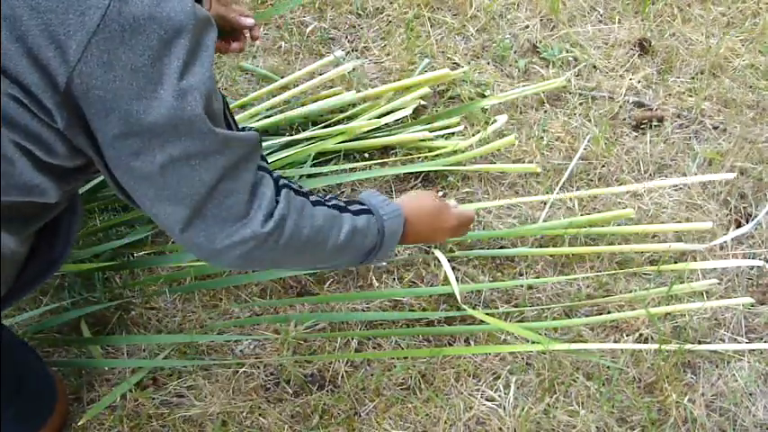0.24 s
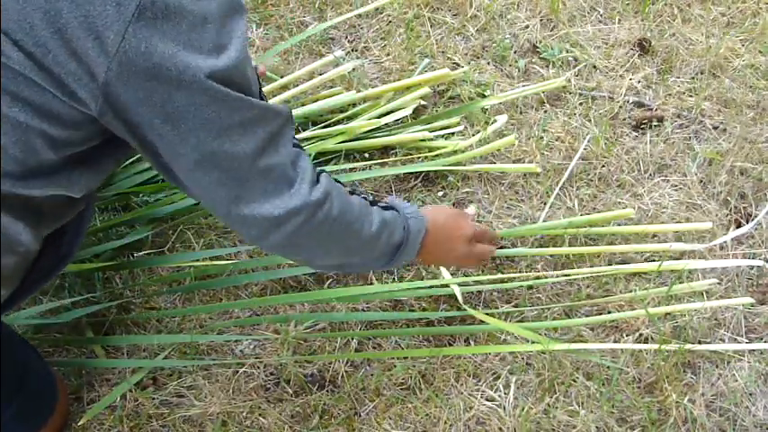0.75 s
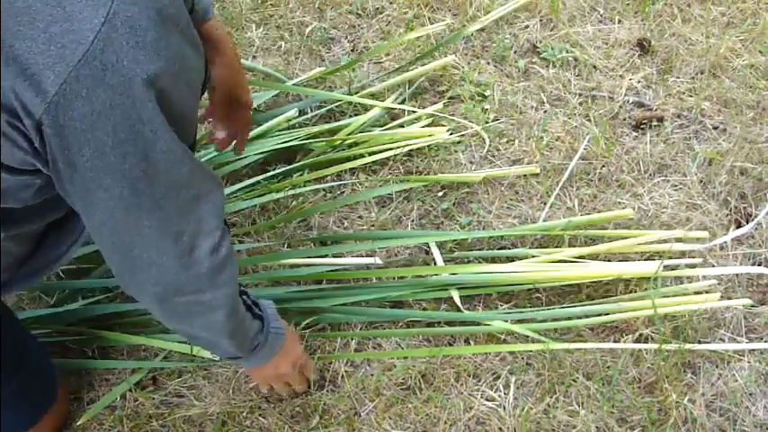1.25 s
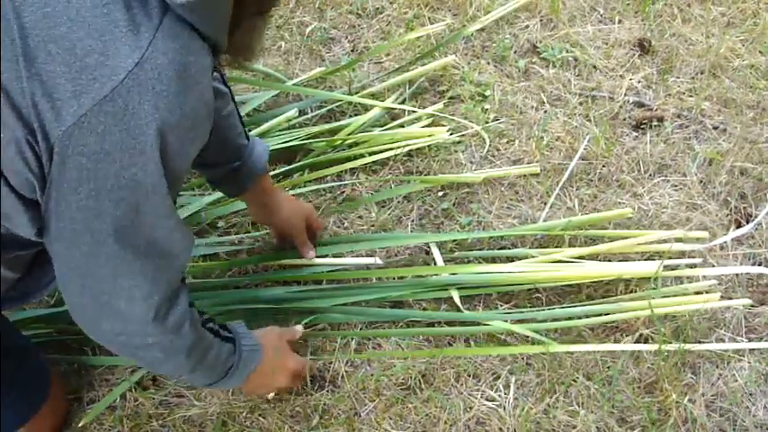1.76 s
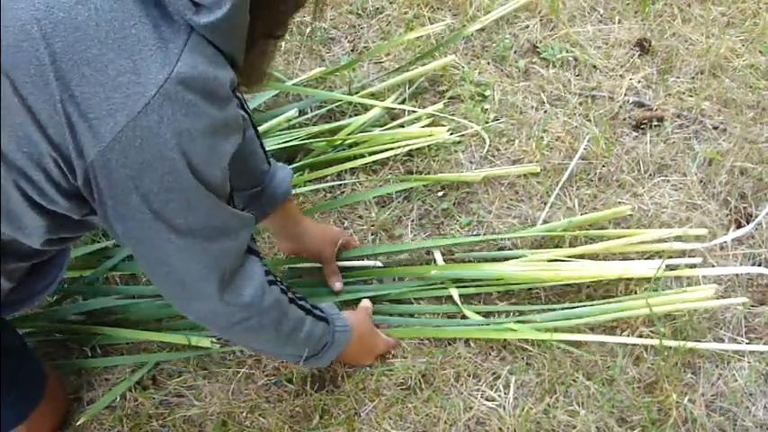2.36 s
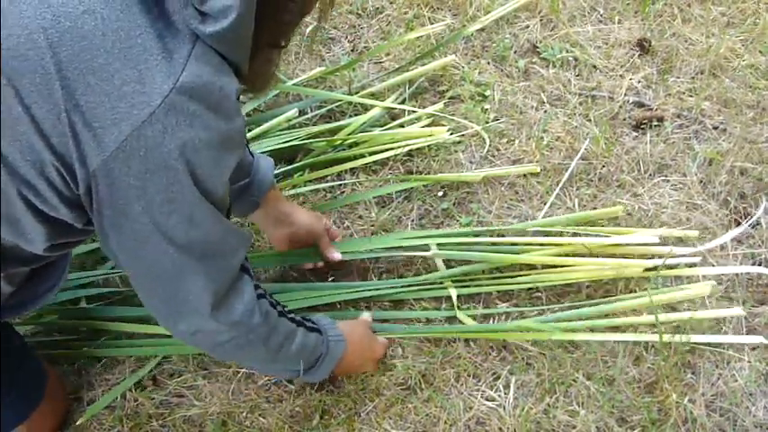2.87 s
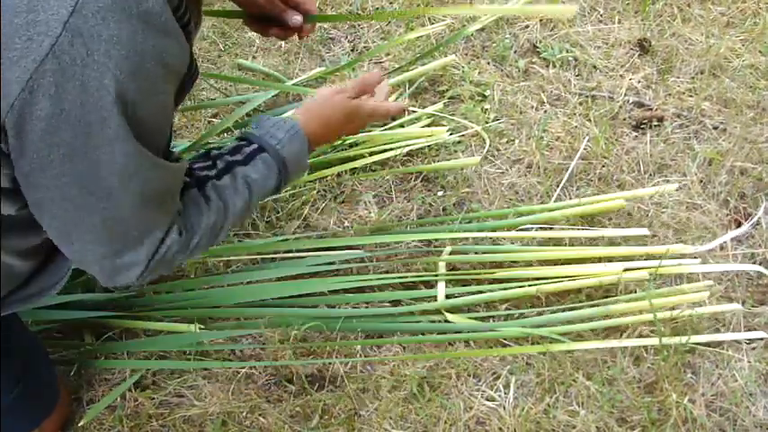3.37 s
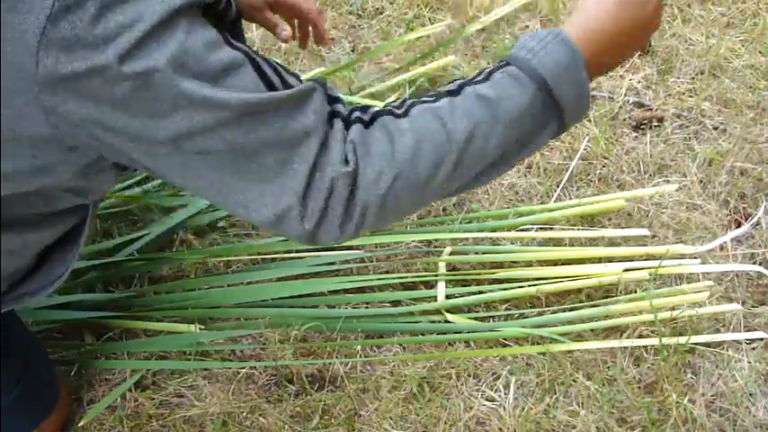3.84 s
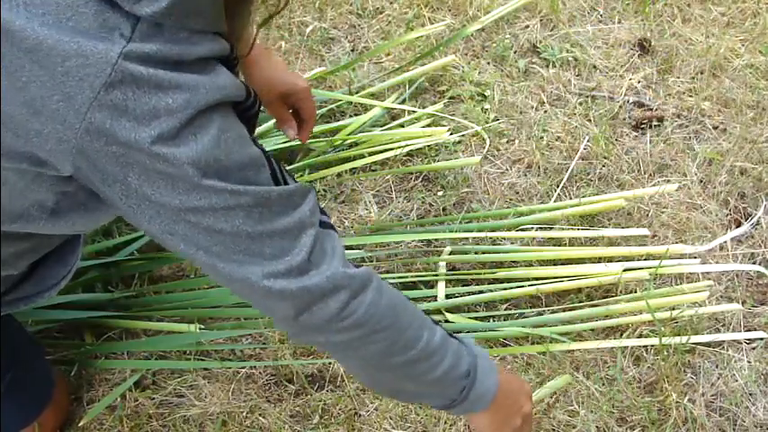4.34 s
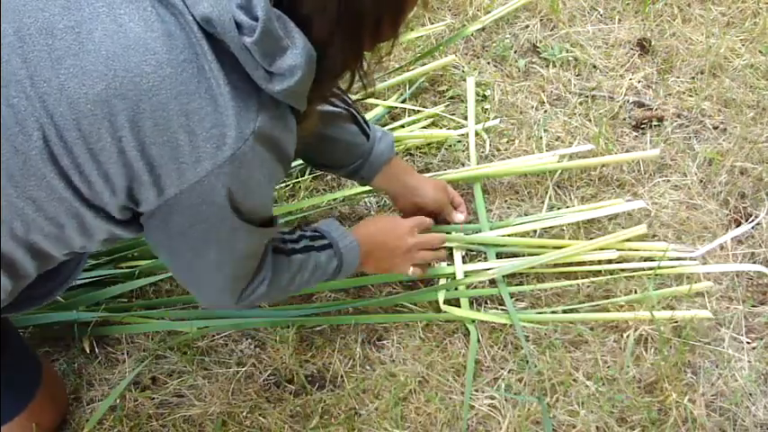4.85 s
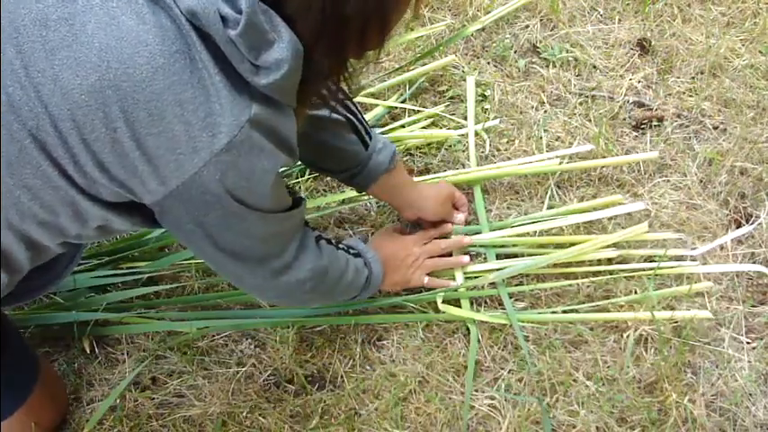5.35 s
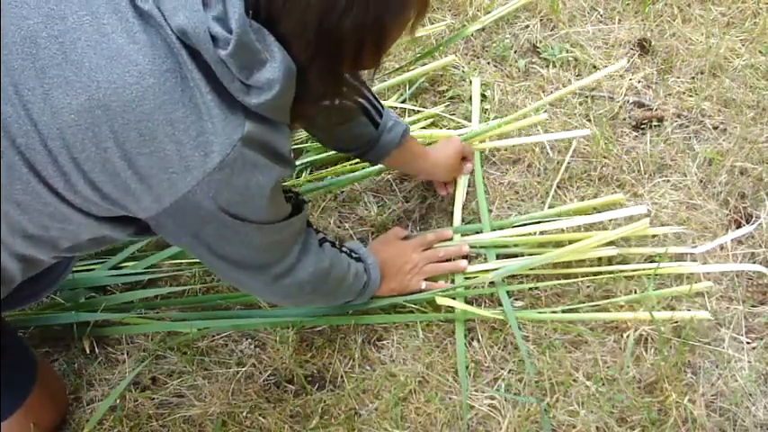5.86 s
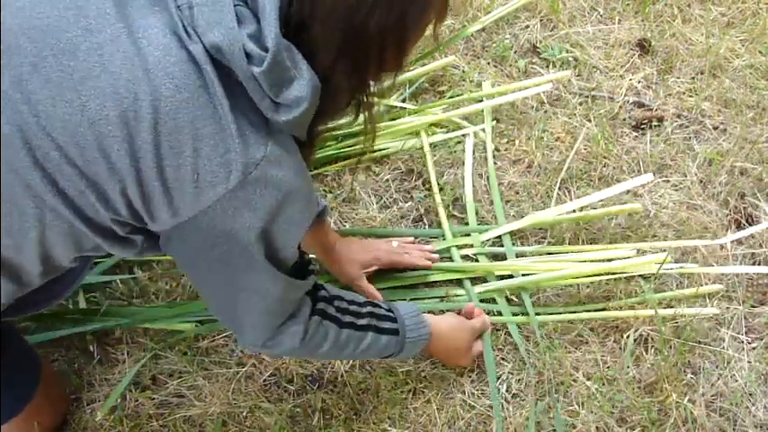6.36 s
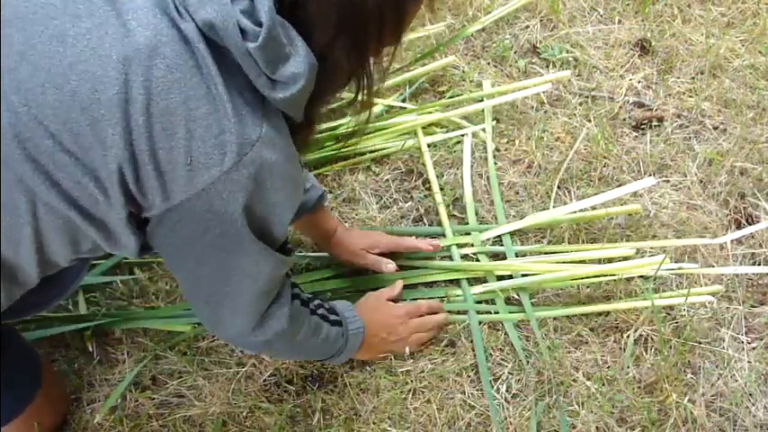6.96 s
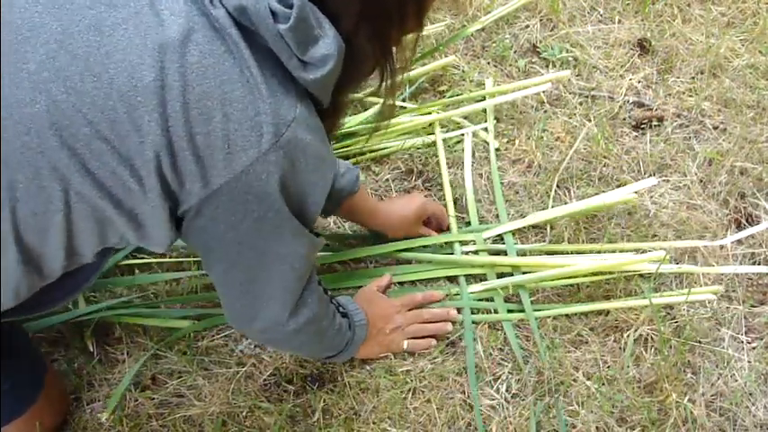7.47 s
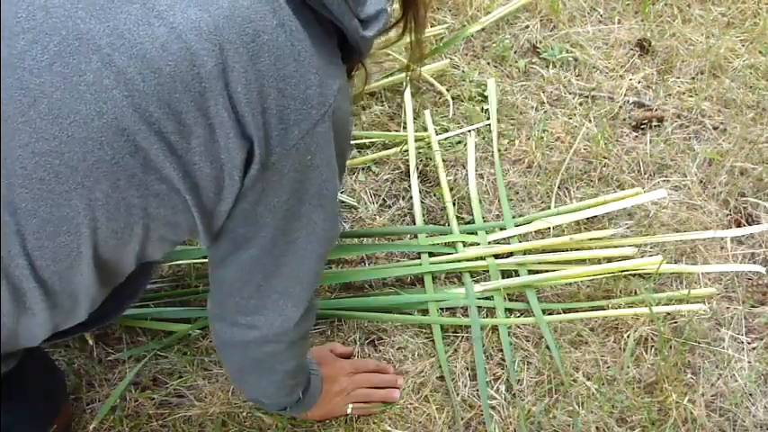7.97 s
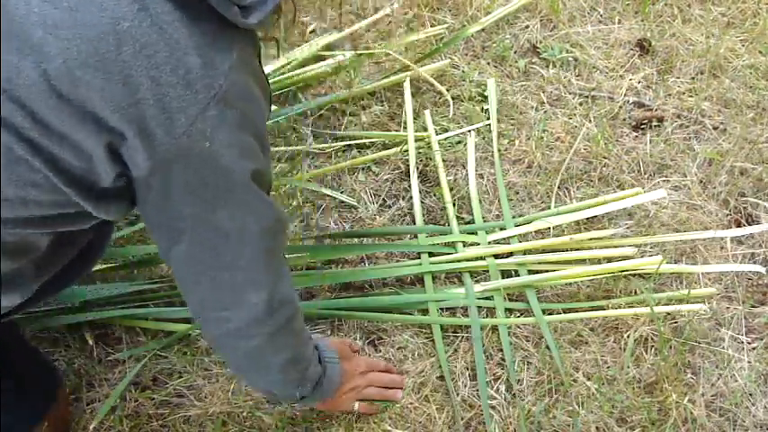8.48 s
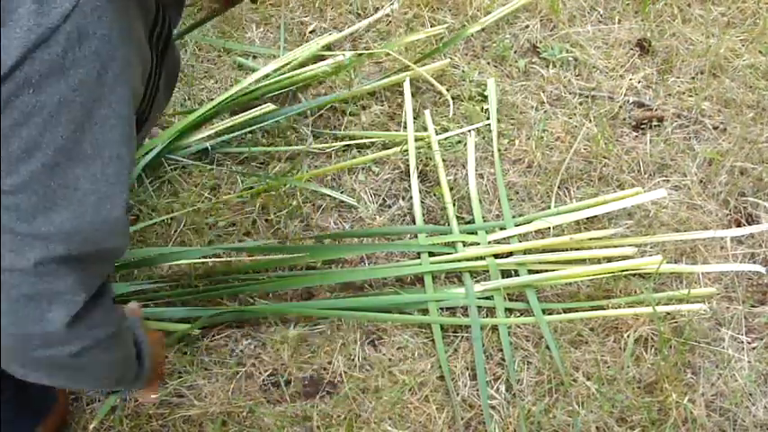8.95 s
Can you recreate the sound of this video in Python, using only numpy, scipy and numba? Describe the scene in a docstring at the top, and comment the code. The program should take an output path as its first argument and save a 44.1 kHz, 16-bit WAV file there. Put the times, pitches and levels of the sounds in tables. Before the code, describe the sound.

Outdoors, close and centred, long stiff leaves are handled over a quiet airy murmur. From 0 to 2 s there is light dry rustling, with a short swish and double tick near 0.8 and faint bird notes at 1.2 to 1.4 and 2.1. From 2.2 to 3.2 the bundle is pushed together: dense, coarse swishing and crackling, a hard snap at 2.8, and a low breath of wind rumbling on the microphone. It drops to near quiet, then softer drags pass at 3.5 to 3.8 and small crackles at 4.1 to 4.6. Rubbing builds from 5.1, with bright sharp snaps at 5.55 and a strong rustling swell to 6.0 and 6.2, then another stroke at 6.4 to 6.6. Meanwhile a songbird warbles rapid gliding whistles, 4.8 to 7.3. Crisp strokes crackle at 7.5 and 7.75; sparse rustle follows, ending with small snaps around 9.1.

```python
"""Weaving long stiff leaves outdoors

Long stiff leaves are dragged and stroked by hand: thousands of tiny slips excite bands of noise that
swish around a moving blade resonance. Creases snap as short noise bursts ringing in a resonator.
A songbird warbles in gliding, near-sine whistles with a faint echo from the trees. Band-filtered noise
murmurs underneath as open air, and the breeze rumbles on the microphone."""
import sys
import numpy as np
from scipy import signal
from scipy.io import wavfile
from scipy.ndimage import uniform_filter1d
from numba import njit

SR = 44100
rng = np.random.default_rng(int(sys.argv[2]) if len(sys.argv) > 2 else 0)


def unload_wav(signal):
    """Save mono or channel-first audio to the path in sys.argv[1] as 16-bit WAV at rate SR, clipped to [-1, 1]."""
    wavfile.write(
        sys.argv[1],
        SR,
        np.round(np.clip(np.atleast_2d(signal).T, -1, 1) * 32767).astype(np.int16),
    )


N = 406161


def undb(db):
    """Decibel law: amplitude gain of a level in dB."""
    return 10 ** (np.asarray(db) / 20)


def unit(x):
    """Normalization: the signal scaled to rms 1."""
    return x / np.sqrt(np.mean(x ** 2))


def curves(table):
    """Linear interpolation: the columns after the time column, one value per sample."""
    seconds, *columns = np.transpose(table)
    return [np.interp(np.arange(N) / SR, seconds, column) for column in columns]


def band_db(table, hz):
    """Proportional bandwidth: a density in dB per Hz gives more level in a wider, higher band."""
    table_hz, db = np.transpose(table)
    density_db = np.interp(np.log(hz), np.log(table_hz), db)
    return density_db + 10 * np.log10(hz / 1000)


@njit
def svf(x, hz, width):
    """Second-order resonance: state-variable band-pass, gain 1 at the centre, width in Hz."""
    y, band_state, low_state = np.empty(len(x)), 0., 0.
    g, damping = np.tan(np.pi * hz / SR), width / hz
    for i in range(len(x)):
        v = (band_state + g * (x[i] - low_state)) / (1 + g * (g + damping))
        band_state = 2 * v - band_state
        low_state = low_state + 2 * g * v
        y[i] = damping * v
    return y


def band(x, hz, share):
    """Cascaded resonance: two passes steepen the skirts; share is each pass's width over its centre."""
    once = svf(x, hz, share * hz)
    return unit(svf(once, hz, share * hz))


def walk(rate):
    """Smoothed random modulation: levels held 1 / rate seconds, averaged twice, rms 1."""
    hold = int(SR / rate)
    steps = np.repeat(rng.standard_normal(N // hold + 1), hold)
    slewed = uniform_filter1d(uniform_filter1d(steps, hold), hold)
    return unit(slewed[:N])


def slips(rate, spread_db):
    """Stick-slip: sparse clicks of either sign, rate per second, many small and a few large."""
    out, count = np.zeros(N), int(rate * N / SR)
    when, size, sign = rng.random((count, 3)).T
    size_db = spread_db * np.minimum(-np.log(1 - size), 5)
    out[(when * N).astype(int)] = np.sign(sign - .5) * undb(size_db)
    return unit(out)


def leaves():
    """Frictional excitation: leaf slips click in all bands, fibres hiss in one, loose tips ring."""
    # Mean leaf spectrum. Each row: frequency in Hz, relative density in dB per Hz.
    leaf_spectrum = [(1000, -21), (1600, -6.5), (2400, -3.5), (3200, -3.5), (4500, -5.5), (5800, -1.5),
                     (7500, -4), (10500, -6.5)]
    # The whole bundle is pushed together and its thick stems rub too.
    push_start_s, push_end_s, stem_hz, stem_peak_db = 2.3, 3.1, 2200, 4
    level_db, blade_hz, bright_db = handling()
    effort = np.clip((level_db + 60.5) / 14, .2, 1.3)  # harder pulls catch more and crackle more
    whole, catch = slips(rate=500, spread_db=2.8), walk(60)  # shared by all bands
    t = np.arange(N) / SR
    pushed = np.clip(10 * np.minimum(t - push_start_s, push_end_s - t), 0, 1)
    out, power = 0, 0
    for hz in 1000 * 2 ** np.arange(0, 3.5, 1 / 3):
        fibres = slips(rate=3000, spread_db=2.8)
        hiss = band(.45 * effort * whole + fibres, hz, share=.38)
        tips = unit(svf(slips(rate=70, spread_db=3.5), hz, 0.09 * hz))
        edge = np.clip(np.log2(hz / 6000), 0, 1)  # thin edges sing higher than broad blades
        blade_db = 6.5 * np.exp(-(np.log2(hz / blade_hz) / 0.52) ** 2)
        stem_db = stem_peak_db * pushed * np.exp(-(2 * np.log2(hz / stem_hz)) ** 2)
        gain = undb(band_db(leaf_spectrum, hz) + blade_db + stem_db + edge * bright_db)
        grip_db = 1.5 * effort * catch + 2.4 * walk(24)  # the grip catches and lets go
        out = out + gain * undb(grip_db) * (hiss + 0.3 * effort * tips)
        power = power + gain ** 2
    return undb(level_db) * out / np.sqrt(power)  # resonances reshape the spectrum, not the level


def handling():
    """Power addition: strokes swell and die over the drag; the louder rub weighs more in the resonance."""
    # Leaves dragging under the hands. Each row: time in seconds, level in dB, blade resonance in Hz,
    # thin-edge brightness in dB.
    drag = [(0, -55, 5800, -1), (.86, -59.5, 5460, -1), (1.9, -49, 5600, -1), (2.17, -49, 4200, 0),
            (2.5, -47, 6000, 0.5), (3.0, -69, 5800, -4), (3.45, -68, 4500, 3), (3.76, -51.5, 4200, -1.5),
            (4.15, -59, 4300, -4), (4.4, -59, 7000, 7), (5.04, -63.5, 4000, -2), (5.52, -49.5, 5000, 8),
            (5.78, -45, 3600, 9), (5.95, -41.5, 4600, 5), (6.08, -64, 4300, 8), (6.55, -53, 4600, 3.5),
            (7.6, -57, 5000, -2), (8.2, -65.5, 4300, 4.5), (8.5, -57, 3200, 1), (9.21, -57, 4500, -4)]
    # Single strokes. Each row: loudest moment in seconds, peak level in dB, seconds to gain the last
    # 10 dB, seconds to lose the first 10 dB, blade resonance in Hz.
    strokes = [(0.794, -42.5, 0.04, 0.035, 6400), (2.322, -46, 0.07, 0.01, 6200),
               (2.414, -41, 0.04, 0.02, 4000), (2.459, -33, 0.0265, 0.006, 5800),
               (2.547, -41, 0.008, 0.012, 4500), (2.603, -44.5, 0.146, 0.045, 5370),
               (2.713, -35.5, 0.049, 0.026, 4400), (2.768, -40.5, 0.009, 0.076, 4700),
               (2.872, -42.5, 0.1, 0.11, 5630), (2.977, -46.5, 0.04, 0.02, 6000),
               (3.087, -44, 0.135, 0.008, 5700), (3.177, -48, 0.015, 0.014, 5200),
               (3.478, -46.5, 0.008, 0.03, 4100), (3.61, -49.0, 0.191, 0.082, 3800),
               (4.436, -47.5, 0.12, 0.035, 5800), (4.516, -45.5, 0.02, 0.01, 6100),
               (4.617, -49.5, 0.046, 0.05, 5500), (5.105, -47, 0.053, 0.018, 4000),
               (5.182, -47.5, 0.035, 0.1, 4000), (5.369, -46.5, 0.04, 0.1, 3600),
               (5.424, -43.5, 0.02, 0.08, 5800), (5.535, -38.5, 0.004, 0.03, 4600),
               (6.003, -39.5, 0.19, 0.07, 4200), (6.181, -38.5, 0.04, 0.0051, 4700),
               (6.233, -39.0, 0.04, 0.0055, 4500), (6.428, -44, 0.25, 0.04, 5200),
               (6.607, -41, 0.042, 0.12, 5500), (7.035, -48, 0.08, 0.05, 5000),
               (7.392, -43, 0.08, 0.012, 4300), (7.439, -47.5, 0.06, 0.04, 3400),
               (7.508, -38.5, 0.012, 0.04, 5200), (7.743, -37.5, 0.084, 0.0261, 5900),
               (8.553, -49, 0.03, 0.02, 6000)]
    t, (drag_db, drag_hz, bright_db) = np.arange(N) / SR, curves(drag)
    power = undb(2 * drag_db)  # doubling the dB turns amplitude into power
    weighted_hz = drag_hz * power
    for peak_s, peak_db, rise_s, fall_s, stroke_hz in strokes:
        i = slice(int(max(peak_s - 4 * rise_s, 0) * SR), int((peak_s + 4 * fall_s) * SR))
        away = np.maximum((peak_s - t[i]) / rise_s, (t[i] - peak_s) / fall_s)
        stroke_power = undb(2 * (peak_db - 10 * away))
        power[i] += stroke_power
        weighted_hz[i] += stroke_power * stroke_hz
    return 10 * np.log10(power), weighted_hz / power, bright_db


def snaps():
    """Impulse response: a noise crack gives a broad tick and rings the blade; big creases tear longer."""
    # Creases that snap. Each row: start in seconds, peak level in dB, ring frequency in Hz.
    creases = [(0.7709, -26, 6800), (0.7885, -27, 6150), (1.131, -35, 8500), (2.1874, -31, 2600),
               (2.452, -20.5, 2600), (2.716, -28, 1900), (2.7668, -14, 5600), (2.779, -32, 2000),
               (2.8654, -28, 5930), (2.92, -36, 2200), (2.972, -35, 2900), (3.475, -35, 5330),
               (4.086, -33, 2610), (4.2906, -28, 8120), (4.3825, -24.5, 7210), (4.6233, -28, 1900),
               (5.1472, -29.5, 4200), (5.5335, -19, 8000), (5.565, -15, 9400), (5.611, -32, 4600),
               (5.879, -26, 7500), (5.9763, -17.5, 4900), (6.2305, -20.5, 6000), (6.4186, -26, 3100),
               (7.4958, -28, 5490), (7.6076, -34, 5460), (7.7, -26, 8500), (7.737, -25, 5700),
               (7.7594, -26.5, 5200), (9.028, -35, 3000), (9.1222, -26, 7300)]
    out, t = np.zeros(N + 1024), np.arange(1024) / SR
    for start_s, peak_db, ring_hz in creases:
        noise = rng.standard_normal(len(t))
        tear_s = 0.00053 * undb(.13 * (peak_db + 33))  # time at which the tear is strongest
        tear = t / tear_s * np.exp(1 - t / tear_s)
        tail = .04 * undb(-60 * t / 0.027)  # falls 60 dB in 27 ms
        crack = noise * (tear + tail)
        ring, tick = svf(crack, 1. * ring_hz, .4 * ring_hz), svf(crack, 7000., 9000.)
        snap = ring + .22 * tick
        i = int(start_s * SR)
        out[i:i + len(t)] += undb(peak_db) * snap / np.abs(snap).max()
    return out[:N]


def bird():
    """Frequency modulation: gliding sines with soft ends and a slight waver, then a diffuse echo."""
    # Songbird notes, each a glide with one turn. Each row: start, turn and end in seconds, start, turn
    # and end frequency in Hz, level at the turn in dB before flicker.
    notes = [(1.149, 1.18, 1.24, 3520, 2900, 3500, -58), (1.3, 1.33, 1.35, 4060, 4140, 3840, -52.5),
             (1.35, 1.385, 1.4, 3840, 3910, 3540, -52), (2.07, 2.135, 2.19, 3980, 4330, 4200, -54),
             (3.298, 3.4, 3.47, 4010, 4020, 4060, -62), (4.838, 4.875, 5.005, 4750, 5170, 5060, -57),
             (5.022, 5.035, 5.055, 5300, 5750, 6200, -58), (5.118, 5.135, 5.15, 3400, 3900, 4500, -58),
             (5.29, 5.31, 5.325, 4200, 3750, 3400, -53), (5.33, 5.35, 5.37, 3150, 3280, 3400, -56),
             (5.483, 5.497, 5.525, 4100, 3630, 4530, -53.5), (5.632, 5.678, 5.698, 5000, 3700, 3120, -48.5),
             (5.766, 5.782, 5.8, 3040, 3550, 3130, -46), (5.851, 5.866, 5.895, 4300, 3480, 4800, -50.5),
             (6.257, 6.28, 6.3, 3150, 3330, 3500, -51), (6.372, 6.41, 6.485, 4180, 3860, 3910, -45),
             (6.64, 6.668, 6.686, 2680, 2850, 3100, -54), (6.679, 6.701, 6.726, 2950, 4210, 2900, -49.5),
             (6.855, 6.87, 6.888, 4900, 4400, 3850, -57.5), (6.963, 6.986, 7.016, 3830, 3830, 3120, -46.5),
             (7.01, 7.047, 7.097, 3200, 2580, 2900, -53), (7.193, 7.228, 7.255, 4270, 3830, 4270, -51.5),
             (7.252, 7.265, 7.278, 4180, 4600, 4970, -51), (7.8, 7.818, 7.835, 2700, 2930, 3170, -56.5)]
    ends_db = -2.5  # a note's set level is highest at its turn
    out, waver = np.zeros(N), walk(60)
    fading = walk(90)  # leaves and air in the path make it flicker
    for *glide, level_db in notes:
        s, hz = glide[:3], glide[3:]
        db = level_db + ends_db * np.array([1, 0, 1])
        i = np.arange(int(s[0] * SR), int(s[-1] * SR))
        smooth_hz = uniform_filter1d(np.interp(i / SR, s, hz), size=400, mode="nearest")
        pitch_hz = smooth_hz * (1 + 0.006 * waver[i])
        depth_db = .2 * (-35 - level_db)  # fainter notes come from further off and flicker more
        fade = np.clip(np.minimum(i - i[0], i[-1] - i) / SR / 0.006, 0, 1)  # 6 ms ends
        gain = undb(np.interp(i / SR, s, db) + depth_db * fading[i])
        whistle = np.sqrt(2) * np.sin(2 * np.pi * np.cumsum(pitch_hz) / SR)  # rms 1
        out[i] += fade * gain * whistle
    t = np.arange(SR // 3) / SR
    # The trees' echo starts after 20 ms and decays at 60 dB in 0.3 s.
    trees = rng.standard_normal(len(t)) * undb(-60 * t / .3) * (t > .02)
    return out + undb(-41) * signal.fftconvolve(out, trees)[:N]


def air():
    """Turbulence noise: gusts lift low third-octave bands more than high and buffet the microphone."""
    # Swelling breeze. Each row: time in seconds, murmur level in dB (only its swing about the median
    # counts), rumble level on the microphone in dB before its random wander.
    breeze = [(0, -59, -77), (1.2, -56.5, -74), (2, -55, -70), (2.8, -54, -62.5), (3.15, -56.5, -80),
              (8.4, -57.5, -80), (9.21, -54.5, -78)]
    # Open-air spectrum. Each row: frequency in Hz, relative density in dB per Hz.
    air_spectrum = [(25, -51), (59, -12), (333, 0), (1100, -2.5), (1420, -4), (6180, -13.5), (10800, -12.5)]
    (gust_db, rumble_db), murmur = curves(breeze), 0
    swing_db = gust_db - np.median(gust_db)
    for hz in 35 * 2 ** np.arange(0, 8.4, 1 / 3):
        reach = np.clip(1.5 - 0.17 * np.log2(hz / 25), 0, 2)  # share of the gust felt in this band
        db = band_db(air_spectrum, hz) + reach * swing_db + 0.37 * walk(5)
        murmur = murmur + undb(db) * band(rng.standard_normal(N), hz, share=0.35)
    buffeting = band(rng.standard_normal(N), hz=85., share=1.64)
    rumble = undb(rumble_db + 3.0 * walk(8)) * buffeting
    return undb(-51.5) * unit(murmur) + rumble


def scene():
    """Superposition: all sources add at one microphone, which feeds both channels."""
    mono = leaves() + snaps() + bird() + air()
    return np.array([mono, mono])


def record(dry):
    """Band limiting: an elliptic low-pass cuts the top steeply."""
    top_hz, ripple_db, rejection_db = 11000, .3, 60
    low_pass = signal.ellip(12, ripple_db, rejection_db, top_hz, fs=SR, output="sos")
    return signal.sosfilt(low_pass, dry)


dry = scene()
out = record(dry)
unload_wav(out)
```